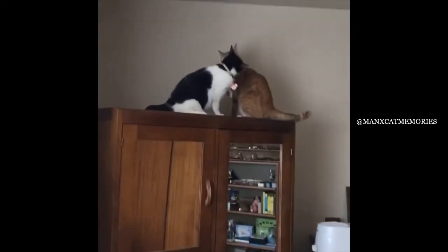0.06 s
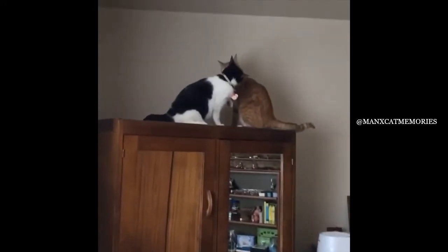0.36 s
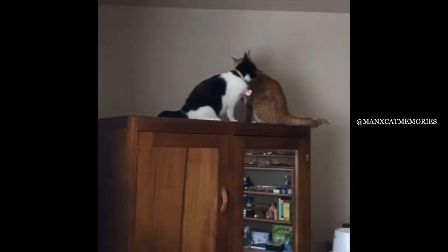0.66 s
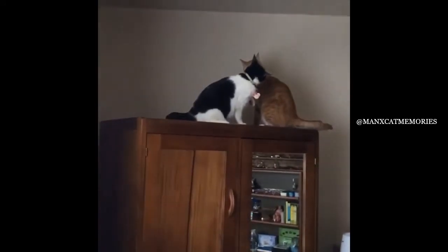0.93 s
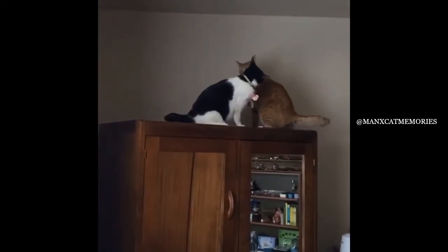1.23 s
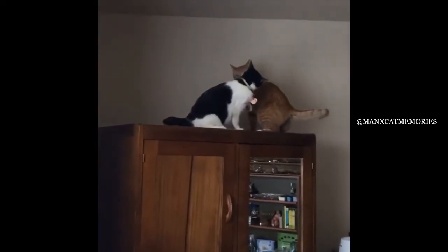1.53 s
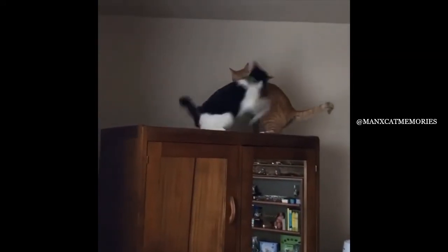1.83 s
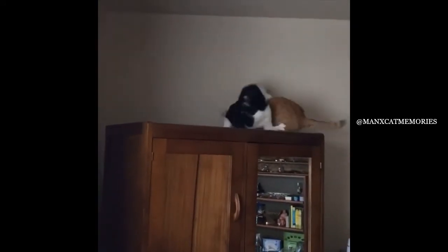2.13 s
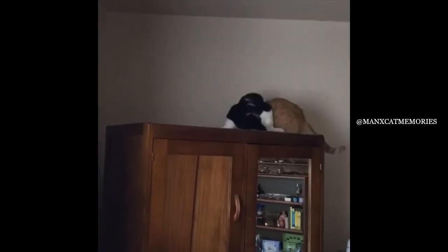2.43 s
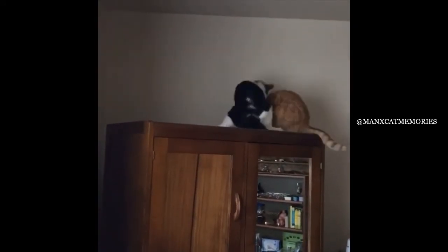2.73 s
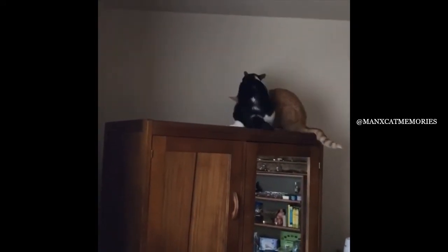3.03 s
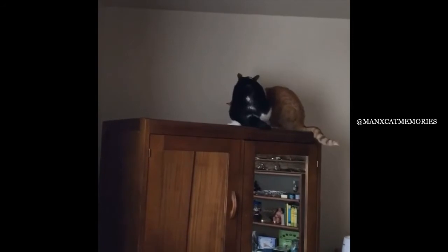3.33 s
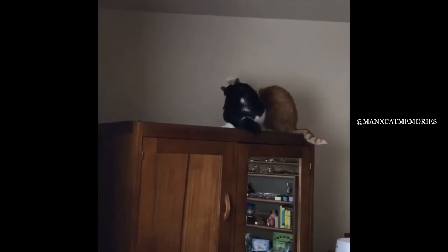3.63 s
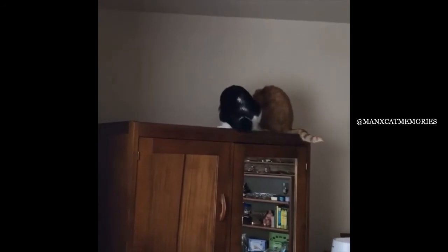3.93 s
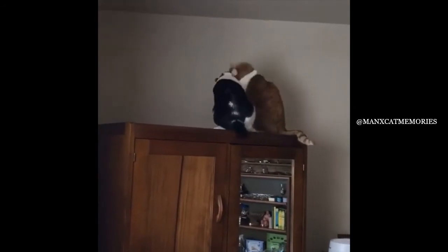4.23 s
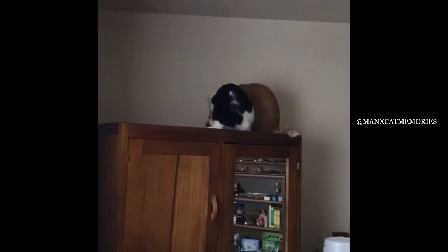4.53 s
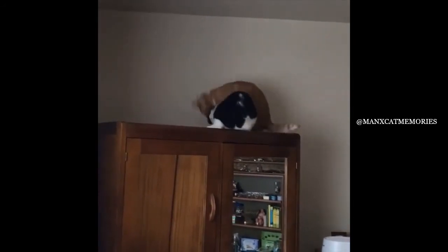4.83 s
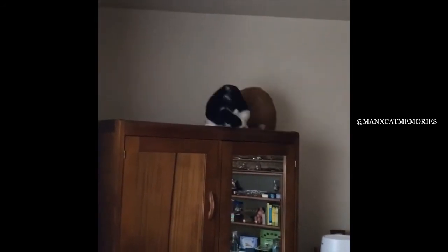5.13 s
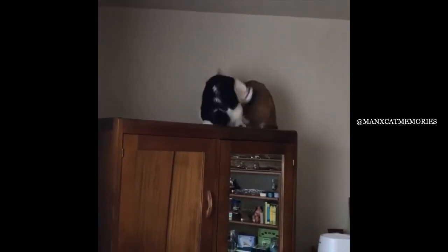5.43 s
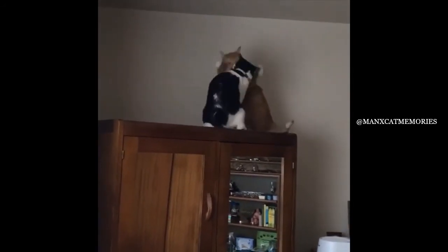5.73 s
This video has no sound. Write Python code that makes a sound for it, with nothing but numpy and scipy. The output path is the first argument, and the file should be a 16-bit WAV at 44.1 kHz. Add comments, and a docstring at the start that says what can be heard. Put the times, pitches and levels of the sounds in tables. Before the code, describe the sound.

In a quiet room with faint hiss and a low hum, two cats start scuffling on a wooden wardrobe. A quick claw swipe sets off a run of hollow bumps, with scuffing paws and rubbing fur. After a short lull, small collar bells rattle, a sharp thump lands, and more scratches and high jingles follow. It is heard from a few metres away.

```python
"""Two scuffling cats thump a hollow wooden wardrobe with paws and bodies, making its panels boom.
They wrestle on top of it: pads scuff the boards, claws scratch and fur rubs, all stick-slip friction.
The small bells on their collars rattle as each jolt throws the pellets against the shells.
It is heard from a few metres away in a quiet room, over faint hiss, rumble and a low drone."""
import sys
import numpy as np
from scipy import signal
from scipy.fft import rfft, irfft
from scipy.io import wavfile
from scipy.ndimage import uniform_filter1d

SR = 44100
rng = np.random.default_rng(int(sys.argv[2]) if len(sys.argv) > 2 else 0)


def wrap_up_sound(samples):
    """Save the sound to the file named by the first command line argument, as 16-bit audio."""
    columns = np.atleast_2d(samples).T
    # keep every value between -1 and 1, then stretch to whole-number steps
    tamed = np.clip(columns, -1, 1)
    steps = np.round(tamed * 32767).astype(np.int16)
    wavfile.write(sys.argv[1], SR, steps)


N = 254898
TIME = np.arange(N) / SR

# blows on the wardrobe, with little force above their hardness: (time [s], level [dB], hardness [Hz])
BLOWS = [(1.711, -39.5, 107), (1.783, -42.5, 290), (1.824, -37, 160), (1.918, -31.5, 99),
         (1.955, -33.5, 190), (2, -38, 340), (2.106, -33, 93.5), (2.358, -43, 249), (2.499, -28, 96),
         (2.691, -18, 124), (2.884, -21, 170), (3.607, -50, 219), (4.784, -17, 494), (5.094, -39.5, 89),
         (5.182, -48, 148), (5.706, -42, 98)]


def amp(db):
    """Decibels to gain."""
    return 10 ** (np.asarray(db) / 20)


def unit_rms(x):
    """Scales to rms 1."""
    return x / np.sqrt(np.mean(x ** 2) + 1e-20)


def unit_peak(x, size=130):
    """Scales so that the loudest stretch of `size` samples has rms 1."""
    return x / np.sqrt(uniform_filter1d(x ** 2, size).max() + 1e-20)


def curve_at(points, hz):
    """Reads a curve on a log-frequency axis."""
    freqs, values = np.transpose(points)
    return np.interp(np.log(hz + 1), np.log(freqs + 1), values)


def colour(x, tone, size=2048):
    """Minimum-phase EQ of unit energy that follows a tone curve."""
    hz = abs(np.fft.fftfreq(size, 1 / SR))
    log_gain = np.log(amp(np.maximum(curve_at(tone, hz), -100)))
    response = np.exp(np.conj(signal.hilbert(log_gain)))
    taps = np.fft.ifft(response).real[:size // 2]
    return signal.oaconvolve(x, taps / np.linalg.norm(taps))[:len(x)]


def uneven(tone, depth_db):
    """No two contacts ring alike: random peaks and dips on a tone curve."""
    hz = np.geomspace(100, 16000, 110)
    return np.c_[hz, curve_at(tone, hz) + depth_db * rng.standard_normal(len(hz))]


def stick_slip(count, per_s, spread_db):
    """Friction grit: random tiny clicks of uneven size."""
    sizes = amp(spread_db * np.minimum(rng.exponential(1, count), 3))
    signs = rng.choice([-1, 1], count)
    slipping = rng.random(count) < per_s / SR
    return unit_rms(sizes * signs * slipping)


def stroke(decay_s, per_s, grip_s):
    """A burst of slips that grows as the paw grips and dies as it comes to rest."""
    t = TIME[:SR // 5]
    envelope = (1 - np.exp(-t / grip_s)) * np.exp(-t / decay_s)
    return envelope * stick_slip(len(t), per_s, spread_db=5)


def held_envelope(start, length_s, attack_s, release_s):
    """Rises over the attack, holds to the end of the length, then dies away."""
    t = TIME - start
    return np.clip(t / attack_s, 0, 1) * np.exp(-np.maximum(t - length_s, 0) / release_s)


def add(mix, start, sound):
    """Mixes a sound in at a time in seconds."""
    part = mix[round(start * SR):][:len(sound)]
    part += sound[:len(part)]


def room(x, wet_db):
    """Adds dense reflections, each band dying at its own speed."""
    # reverb decay: (frequency [Hz], t60 [s])
    decay_times = [(80, 0.43), (250, 0.75), (1000, 0.15), (4000, 0.27), (12000, 0.13)]
    onset = np.clip((TIME[:SR] - 0.003) / 0.0075, 0, 1)
    hz, t, bands = signal.stft(rng.standard_normal(SR) * onset, SR, nperseg=256)
    decay = amp(-60 * t / curve_at(decay_times, hz)[:, None])
    tail = signal.istft(bands * decay, SR, nperseg=256)[1]
    return x + amp(wet_db) * signal.oaconvolve(x, tail / np.linalg.norm(tail))[:N]


def room_tone():
    """A bed of faint hiss and rumble, with narrow noise bands for a low wavering drone."""
    # spectrum of the bed: (frequency [Hz], relative level [dB])
    air_tone = [(12, -70), (20, -18.5), (54, -3.5), (75, -0.5), (122, -5), (170, -16), (286, -16.5),
                (443, -29.5), (494, -35), (551, -29.5), (809, -33.5), (1220, -33.5), (1400, -36),
                (1950, -39.5), (14000, -50.5)]
    # drone bands: (frequency [Hz], width [Hz], level [dB])
    drone_bands = [(88.8, 22, -58.5), (121.34, 2.7, -58.5)]
    hz = np.fft.rfftfreq(N, 1 / SR)
    air = irfft(rfft(rng.standard_normal(N)) * amp(curve_at(air_tone, hz)), N)
    out = amp(-56) * unit_rms(air)
    for centre, width, db in drone_bands:
        band = 1 / (1 + (2 * (hz - centre) / width) ** 2)
        out += amp(db) * unit_rms(irfft(rfft(rng.standard_normal(N)) * band, N))
    return out


def rustle():
    """Fur and pads rub in fits and starts while the cats push at each other."""
    # one cat sliding against the other: (time [s], length [s], relative rub [dB], relative fizz [dB])
    shoves = [(1.664, 0.17, -57, -72), (1.805, 0.051, -51, -57.5), (1.92, .13, -58, -63.5),
              (2.136, 0.082, -61, -72.5), (2.35, 0.13, -65, -73.5), (2.444, .11, -59.5, -70.5),
              (2.752, .12, -72, -84), (4.049, 0.078, -67, -59), (4.32, 0.16, -61, -62),
              (4.55, 0.039, -64, -56.5), (4.678, .2, -62, -68), (5.035, 0.054, -66, -62),
              (5.14, .19, -65.5, -57), (5.498, 0.078, -63, -69), (5.684, 0.065, -54.5, -47)]
    # dull rub on the boards: (frequency [Hz], relative level [dB])
    rub_tone = [(250, -16), (500, -6), (800, -2.5), (1150, -1.5), (1500, -5), (2000, -2.5), (3000, -12),
                (5000, -18.5), (14000, -36)]
    # bright fizz of fur: (frequency [Hz], relative level [dB])
    fizz_tone = [(2000, -14), (4000, -2), (5500, -9.5), (7500, -1.5), (10000, -2), (12700, -1.5),
                 (14000, -12.5)]
    wander = uniform_filter1d(uniform_filter1d(rng.standard_normal(N), size=400), size=200)
    fits = amp(3 * unit_rms(wander))
    rub, fizz, out = np.zeros((3, N))
    for start, length, rub_db, fizz_db in shoves:
        push = held_envelope(start, length, attack_s=0.012, release_s=0.062)
        rub = np.maximum(rub, amp(rub_db) * push)
        fizz = np.maximum(fizz, amp(fizz_db) * push)
    for envelope, tone in ((rub, rub_tone), (fizz, fizz_tone)):
        out += colour(envelope * fits * stick_slip(N, per_s=2000, spread_db=2), tone)
    return amp(-6) * room(out, wet_db=-7)


def paw_knocks():
    """Scuff rows for each blow: the paw knocks the boards, then settles softer and lower."""
    rows, decay_s, landing_hz, settling_hz = [], 0.011, 530, 386
    for start, db, hardness_hz in BLOWS:
        knock_db = db - 24.5 + 2 * np.log2(hardness_hz / 170)  # harder blows knock louder
        rows.append((start, knock_db, decay_s, landing_hz))
        rows.append((start + 0.016, knock_db - 2, decay_s, settling_hz))
    return rows


def pads():
    """Soft scuffs, each coloured by the resonance of the spot on the boards where it lands."""
    # pads on the top boards: (time [s], relative level [dB], decay [s], resonance [Hz])
    scuffs = [(.689, -44, 0.013, 1190), (0.784, -50, 0.006, 716), (0.982, -50.5, 0.0066, 1150),
              (1.62, -45, 0.0059, 750), (1.661, -41.5, 0.0042, 1970), (1.784, -31.5, 0.0042, 1200),
              (2, -47.5, .016, 1420), (2.144, -39.5, 0.0062, 2160), (2.484, -50.5, 0.017, 1830),
              (2.681, -43, 0.0086, 870), (4.487, -41.5, 0.0036, 2230), (4.792, -45, 0.012, 1540),
              (5.095, -46, 0.014, 630), (5.49, -50, 0.0063, 2060), (5.698, -41.5, .012, 1300)]
    # pad on wood: (frequency [Hz], relative level [dB])
    scuff_tone = [(220, -19.5), (400, 1), (650, -1.5), (900, -6.5), (1200, -7), (1600, -11), (2500, -12),
                  (3600, -12.5), (5000, -25.5), (9000, -21), (14000, -50.5)]
    out = np.zeros(N)
    for start, db, decay_s, spot_hz in scuffs + paw_knocks():
        hz, tone_db = uneven(scuff_tone, depth_db=2).T
        resonance_db = 15.5 / (1 + (2 * np.log2(hz / spot_hz)) ** 2)  # one octave wide
        slips = stroke(decay_s, per_s=2600, grip_s=0.0031)
        scuff = colour(slips, np.c_[hz, tone_db + resonance_db])
        add(out, start, amp(db) * unit_peak(scuff))
    return amp(-9.5) * room(out, wet_db=-5)


def rake(start, count, gap_s, first_db, step_db, decay_s):
    """Catch rows for a raking paw: its claws snag one after another, slightly uneven in time."""
    gaps = gap_s * rng.uniform(0.7, 1.3, count)
    times = start + np.cumsum(gaps) - gaps
    return [(time, first_db + k * step_db, decay_s) for k, time in enumerate(times)]


def claws():
    """Claws catch on the wood in short bright scratches, singly and in one fading rake."""
    # single catches: (time [s], relative level [dB], decay [s])
    catches = [(1.572, -47.5, 0.0034), (2.149, -48.5, 0.0042), (2.885, -46, 0.0044), (3.923, -44.5, 0.0028),
               (4.087, -37.5, .007), (4.12, -36, 0.0017), (4.449, -39.5, 0.0036), (4.487, -46, 0.0048),
               (4.807, -41, 0.0025), (5.037, -50.5, .012), (5.081, -44.5, 0.0028), (5.162, -42, 0.0079),
               (5.682, -47, 0.0073)]
    # claw on wood: (frequency [Hz], relative level [dB])
    claw_tone = [(290, -13), (500, -38), (661, -19.5), (1800, -3.5), (2070, -1.5), (4220, -3.5), (5280, -6),
                 (6320, 0), (9480, -1), (10700, -0.5), (11800, -3), (12500, 9), (14000, -28)]
    raked = rake(start=5.693, count=7, gap_s=0.0085, first_db=-23, step_db=-1.5, decay_s=0.0025)
    out = np.zeros(N)
    for start, db, decay_s in catches + raked:
        slips = stroke(decay_s, per_s=3500, grip_s=0.00037)
        scratch = colour(slips, uneven(claw_tone, depth_db=6))
        add(out, start, amp(db) * unit_peak(scratch))
    return amp(-10.5) * room(out, wet_db=-4)


def swipe():
    """One hard swipe as the fight breaks out: the claws skid, skip and briefly bite again."""
    # rasp of skidding claws: (frequency [Hz], relative level [dB])
    rasp_tone = [(300, -5.5), (1100, -15), (2300, -2), (3300, 0.5), (4050, -11), (4600, 0.5), (5750, -15),
                 (6900, -0.5), (8400, -0.5), (9900, 7.5), (11200, -7.5), (12700, 3.5), (14000, -7)]
    start, skip_s = 1.779, 0.0176
    skid = held_envelope(start, length_s=0.012, attack_s=0.0035, release_s=0.0033)
    rebite = held_envelope(start + skip_s, length_s=0.0042, attack_s=0.0035, release_s=0.0033)
    slips = (skid + amp(-2.5) * rebite) * stick_slip(N, per_s=12000, spread_db=1.5)
    return amp(-32) * room(colour(slips, rasp_tone), wet_db=-4.5)


def head_shakes():
    """Jolt rows for shaking heads: one jolt of the collar per swing, evenly spaced."""
    # shakes: (time [s], swings, spacing [s], relative level [dB], step [dB], second bell's share [0-1])
    shakes = [(4.313, 2, 0.053, -46, 0, 0.07), (4.436, 3, 0.025, -47.5, -1, 0.2),
              (5.226, 4, 0.038, -35, 0.1, 0.98), (5.492, 2, 0.017, -50.5, 5, 0),
              (5.692, 3, 0.025, -29.5, -3.5, 0.92)]
    return [(start + k * swing_s, db + k * step_db, share)
            for start, count, swing_s, db, step_db, share in shakes for k in range(count)]


def bell(modes, t):
    """One strike: where the pellet lands and how fur presses the shell shift each mode's level and pitch."""
    ring = np.zeros(len(t))
    for hz, db, t60 in modes:
        pitch = hz * rng.normal(1, 0.006)
        strength_db = db + rng.uniform(-4, 4)
        ring += amp(strength_db - 60 * t / t60) * np.sin(2 * np.pi * (pitch * t + rng.random()))
    return ring


def collars():
    """Each jolt throws the pellets against their shells: a clack, a short ring, three weaker bounces."""
    # single jolts: (time [s], relative level [dB], second bell's share [0-1])
    jolts = [(2.631, -55.5, 0.08), (2.758, -61.5, 0), (4.053, -54.5, 0.3), (4.095, -45, 0.1),
             (4.562, -38, 0.07), (4.73, -48.5, 0.16), (4.814, -48.5, 0.9), (5.119, -39.5, 0),
             (5.173, -36, 0.9), (5.567, -55, 0.1)]
    # shell modes of each bell: (frequency [Hz], relative level [dB], t60 [s])
    first_bell = [(4280, -4.5, 0.067), (7020, 2, 0.088), (9900, -8, .04), (11500, -5.5, 0.018),
                  (12360, 5, 0.04), (12650, 3, 0.023)]
    second_bell = [(5460, -4, 0.039), (6840, -2, 0.018), (8830, -0.5, 0.039), (9730, 1, 0.045),
                   (9560, -1, 0.012), (11130, 4.5, 0.019), (11270, 4, 0.047)]
    # pellet on shell: (frequency [Hz], relative level [dB])
    clack_tone = [(400, -34), (1200, -8), (2500, -4.5), (4300, -7.5), (7000, -0.5), (9500, 4.5), (12400, 2),
                  (14000, -6.5)]
    out, t = np.zeros(N), TIME[:SR // 4]
    attack = 1 - np.exp(-t / 0.001)
    for start, db, share in jolts + head_shakes():
        for bounce in range(4):
            ring = np.sqrt(1 - share) * bell(first_bell, t) + np.sqrt(share) * bell(second_bell, t)
            burst = rng.standard_normal(len(t)) * np.exp(-t / 0.0026)
            clack = colour(burst, uneven(clack_tone, depth_db=4.5))
            strike = unit_peak((unit_peak(ring) + unit_peak(clack)) * attack)
            delay_s = bounce * 0.016 * rng.uniform(0.48, 1.2)
            add(out, start + delay_s, amp(db - 10.6 * np.sqrt(bounce)) * strike)
    return amp(-4) * room(out, wet_db=-6.5)


def thumps():
    """The wardrobe booms: a soft blow wakes its lowest modes, a hard one the higher panels too."""
    # modes of the panels and the air inside: (frequency [Hz], relative level [dB], t60 [s], build-up [s])
    wardrobe_modes = [(59.44, -15.5, 0.58, 0.0093), (72.8, -12, 0.31, 0.049), (91.16, 0.5, 0.28, 0.019),
                      (113.3, -5, 0.28, 0.0075), (165, 3.5, 0.11, 0.0036), (179.3, -0.15, 0.12, 0.00077),
                      (250.7, 1.5, 0.2, 0.006), (261.7, 5.5, 0.22, 0.051), (285.1, -8, 0.3, 0.033),
                      (318.4, -11.5, 0.23, 0.036), (360, -14, 0.17, 0.018), (433, -21.5, 0.25, 0.0063),
                      (577, -14, 0.062, 0.0053)]
    out, t = np.zeros(N), TIME[:SR]
    for start, db, hardness_hz in BLOWS:
        boom = np.zeros(SR)
        for k, (hz, mode_db, t60, build_s) in enumerate(wardrobe_modes):
            # neighbouring modes push opposite ways, so the boom swells and beats
            force = (-1) ** k / (1 + (hz / hardness_hz) ** 3)
            envelope = amp(mode_db - 60 * t / t60) * (1 - np.exp(-t / build_s))
            boom += force * envelope * np.sin(2 * np.pi * hz * t)
        add(out, start, amp(db) * unit_peak(boom, size=440))
    return room(out, wet_db=-22)


def scene():
    """The scuffle over the room tone, in mono."""
    return (thumps() + pads() + claws() + swipe() + collars() + rustle() + room_tone())[None]


def record(dry):
    """A steep low-pass trims the top end at 14 kHz."""
    lowpass = signal.firwin(255, 14000, window=("kaiser", 8), fs=SR)
    return signal.oaconvolve(dry, lowpass[None], "same")


dry = scene()
out = record(dry)
wrap_up_sound(out)
```